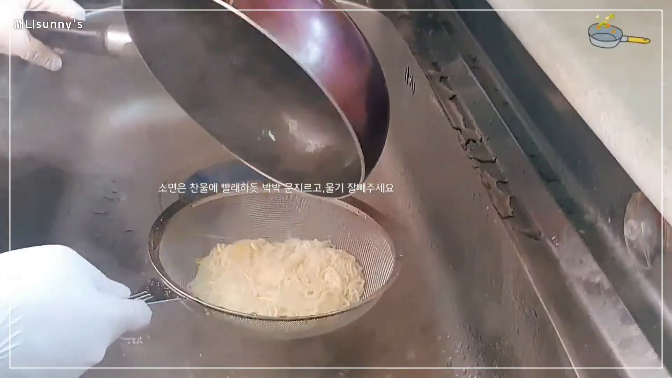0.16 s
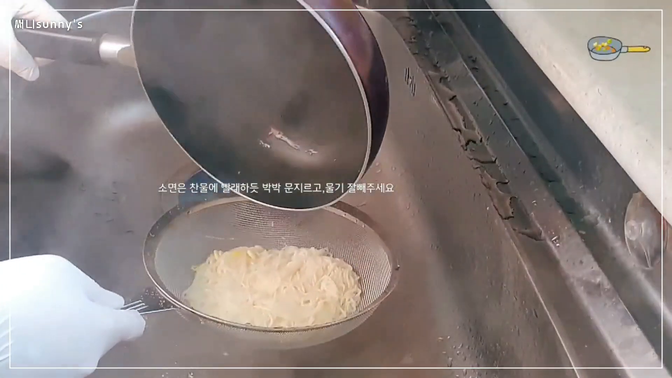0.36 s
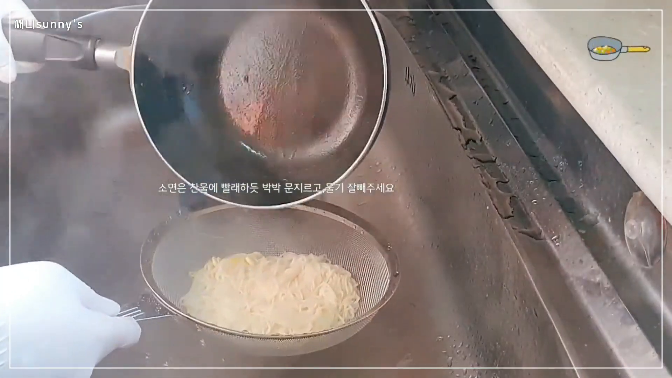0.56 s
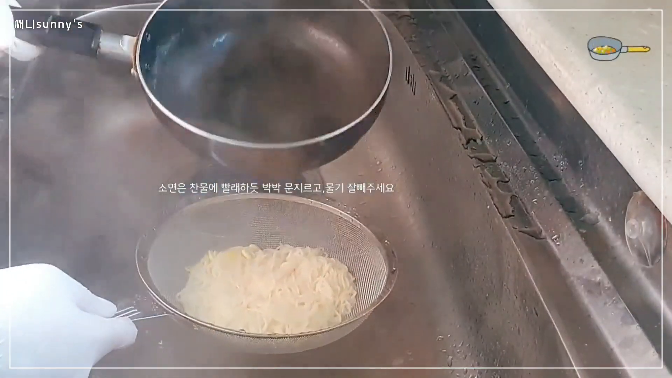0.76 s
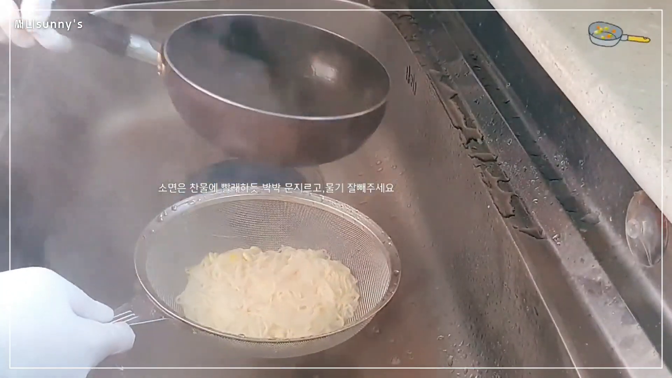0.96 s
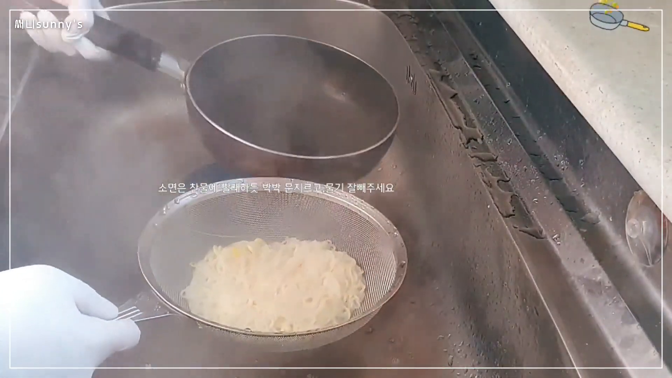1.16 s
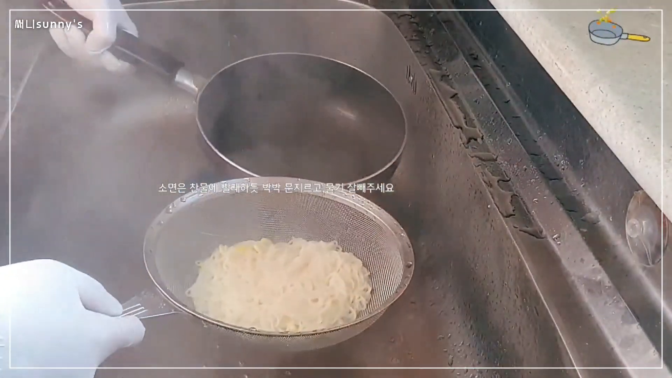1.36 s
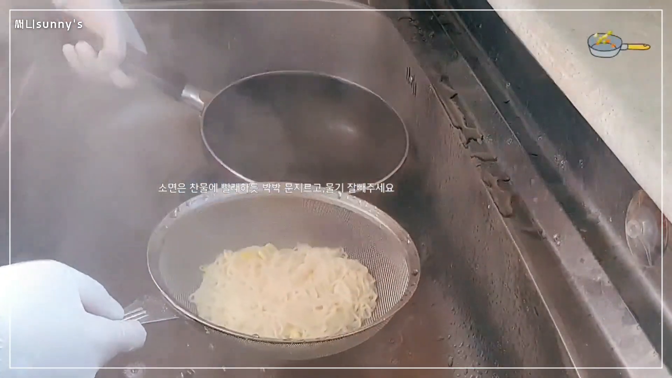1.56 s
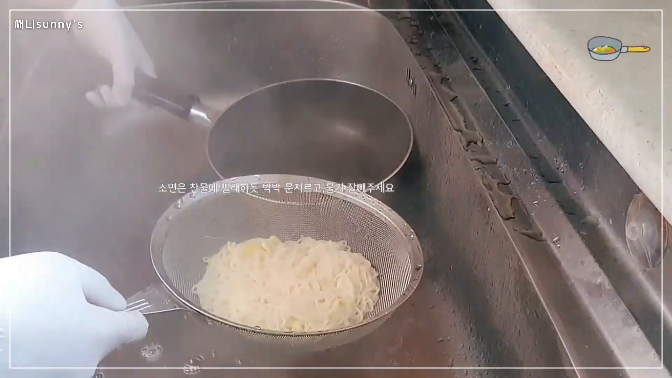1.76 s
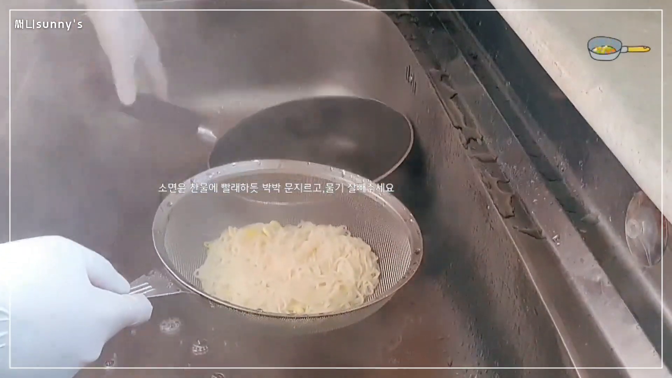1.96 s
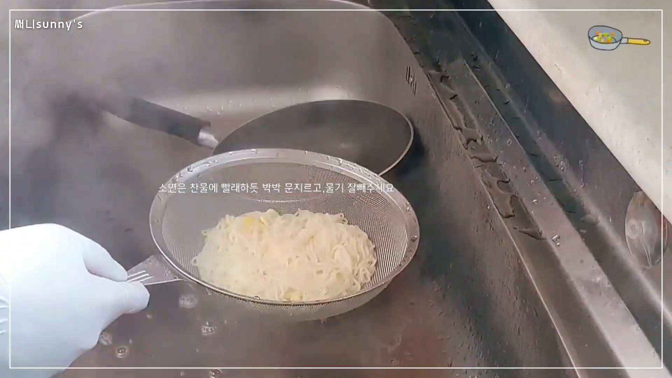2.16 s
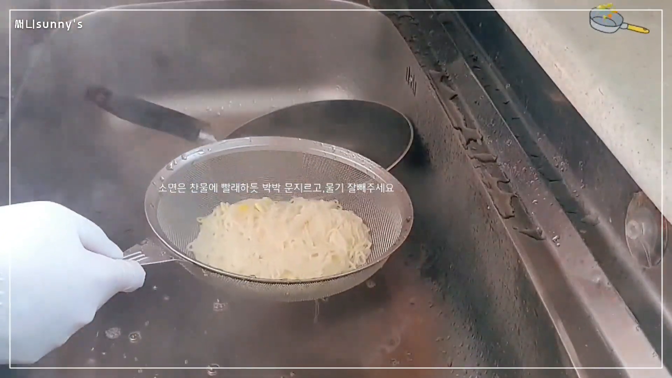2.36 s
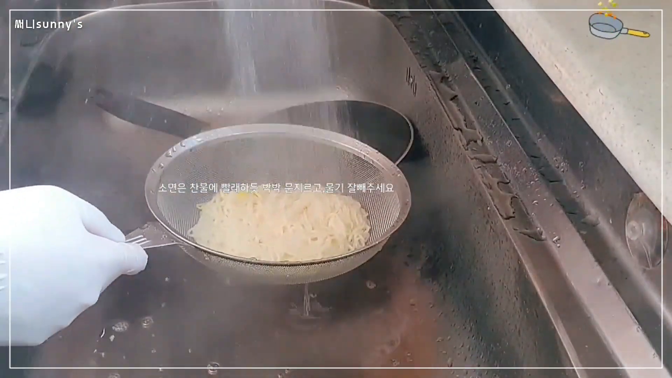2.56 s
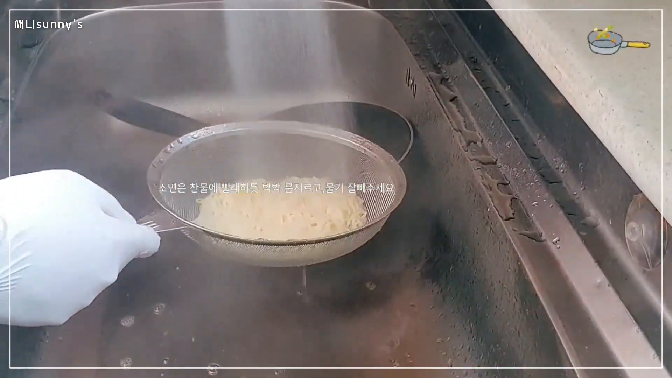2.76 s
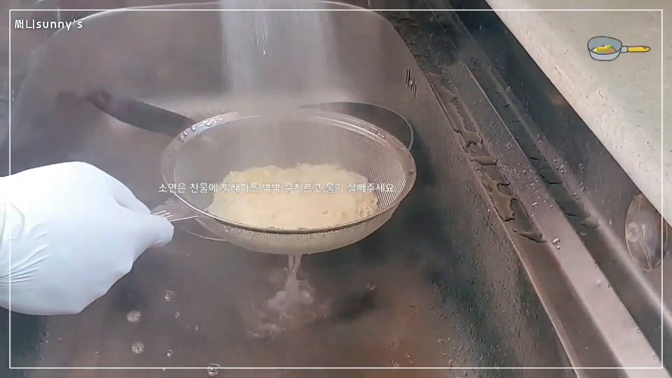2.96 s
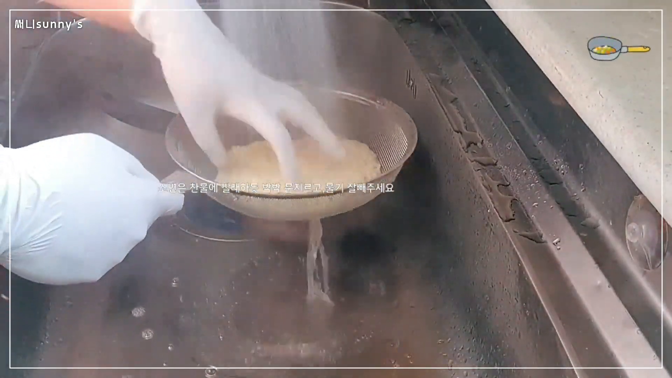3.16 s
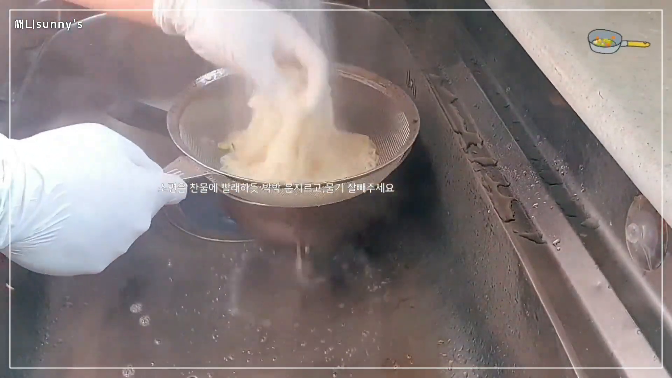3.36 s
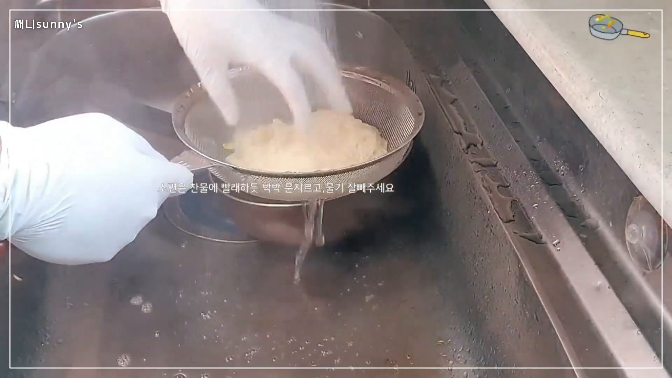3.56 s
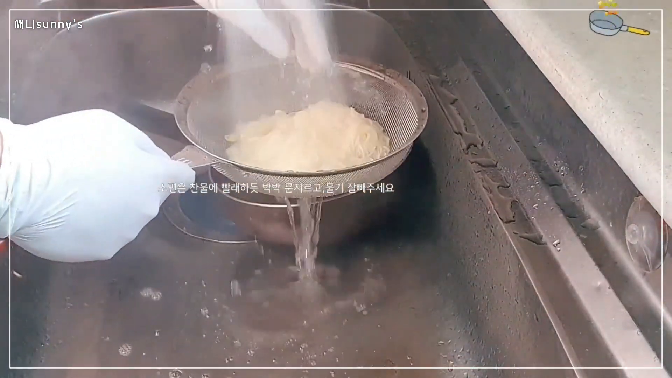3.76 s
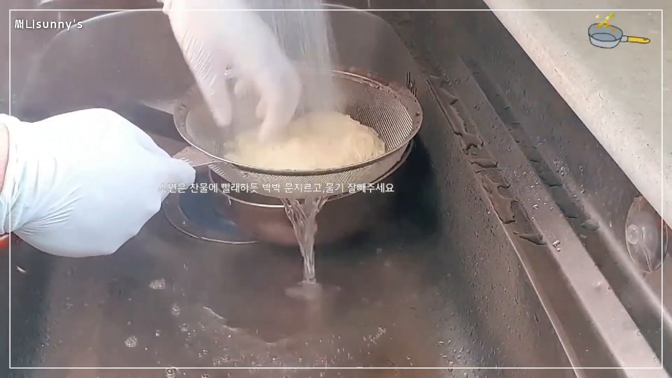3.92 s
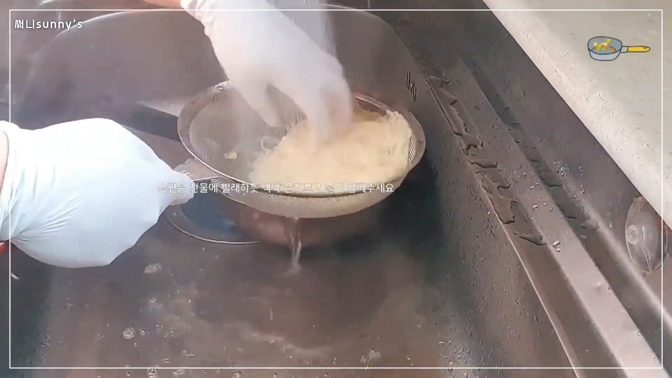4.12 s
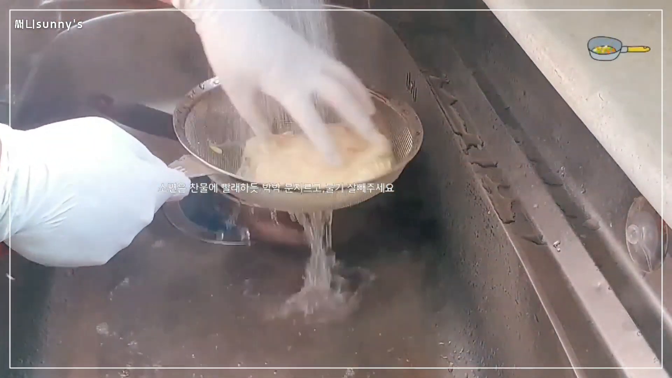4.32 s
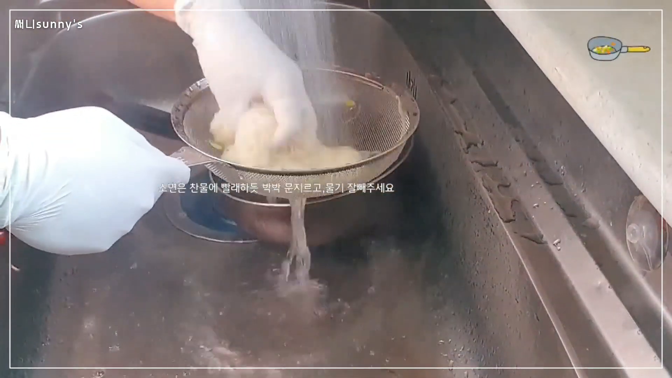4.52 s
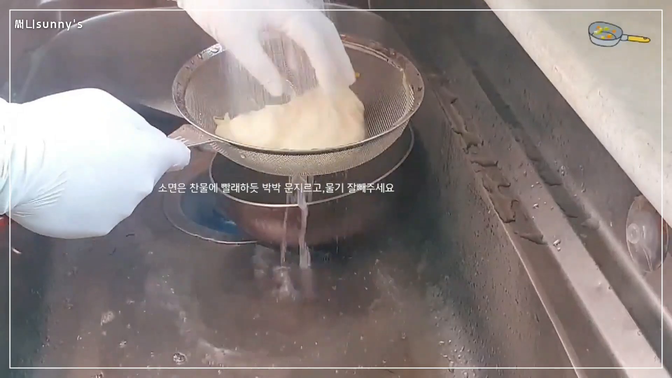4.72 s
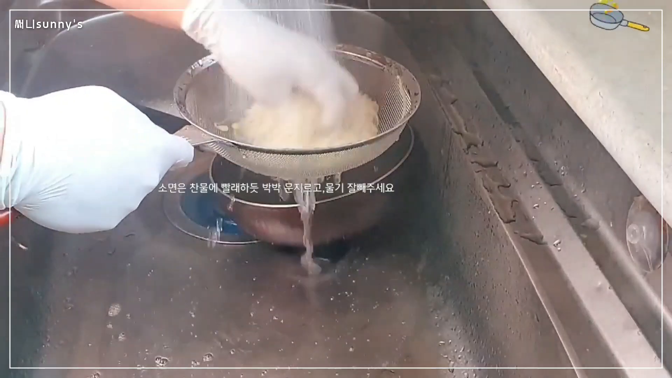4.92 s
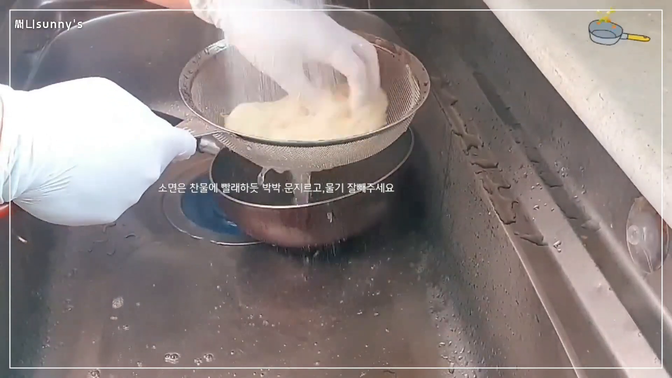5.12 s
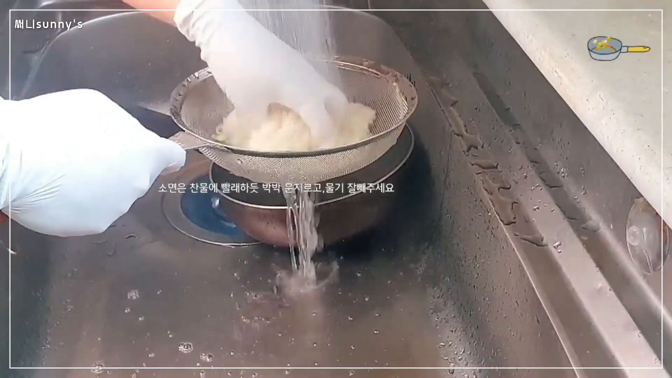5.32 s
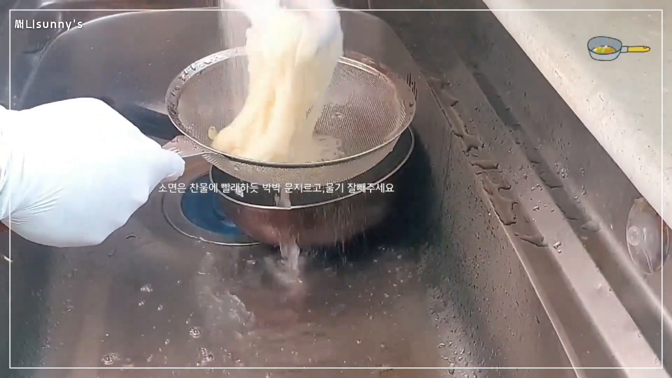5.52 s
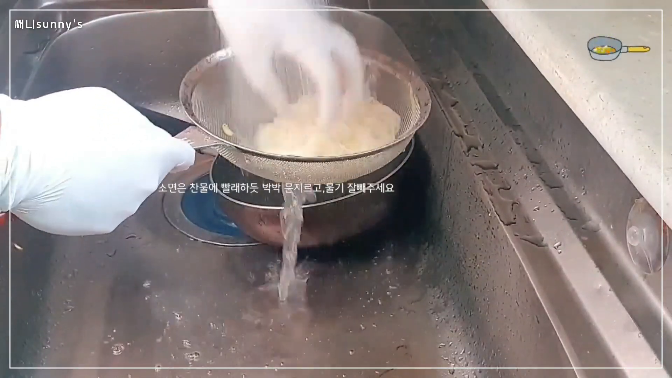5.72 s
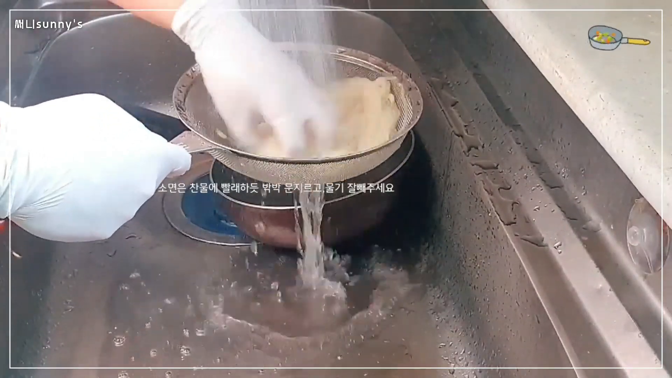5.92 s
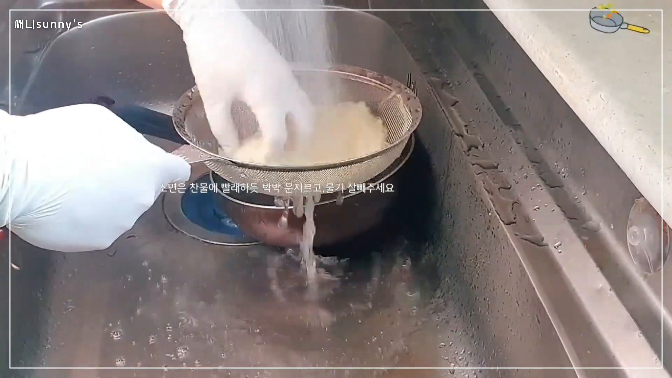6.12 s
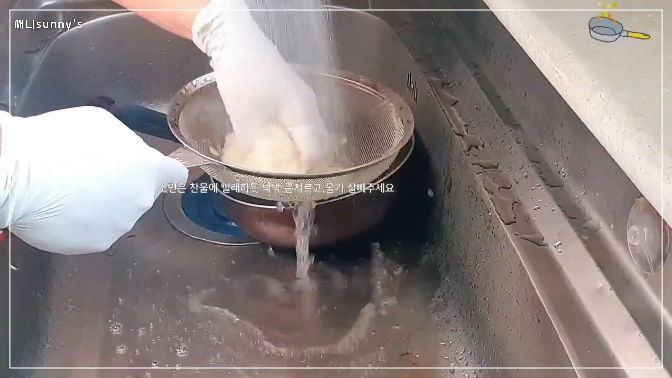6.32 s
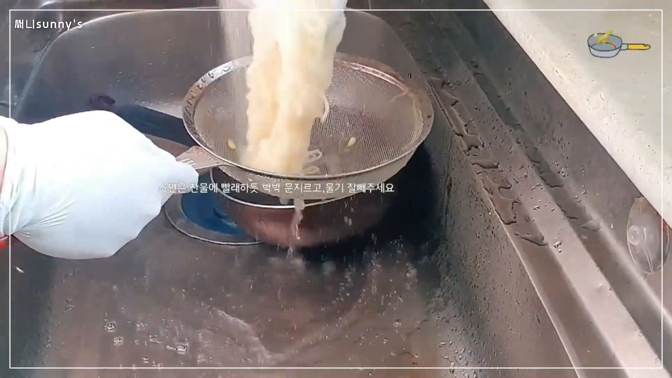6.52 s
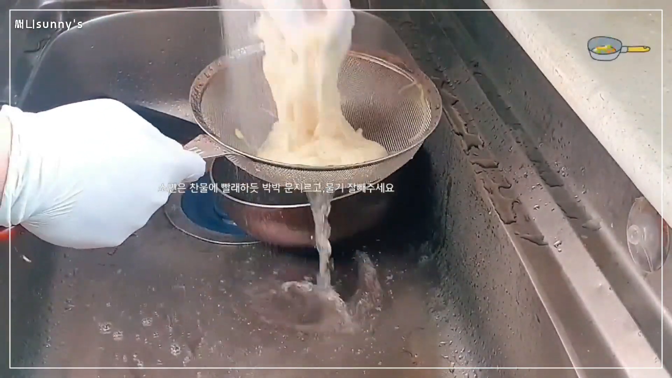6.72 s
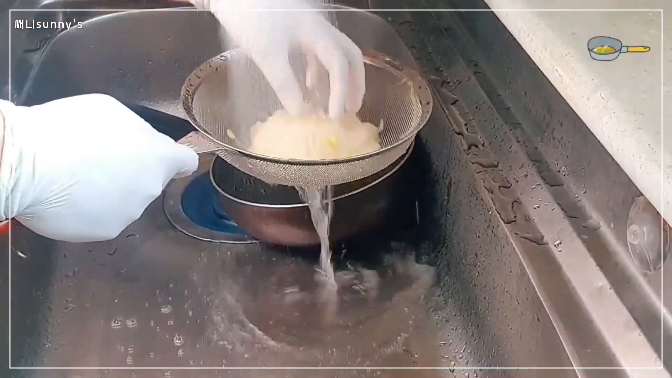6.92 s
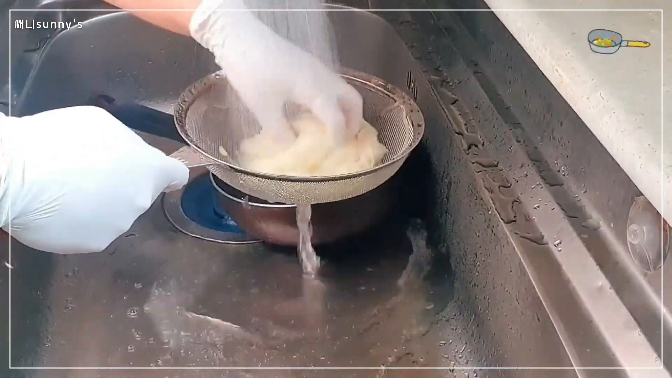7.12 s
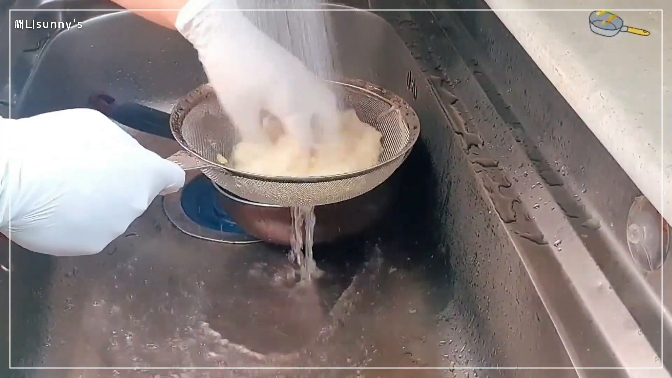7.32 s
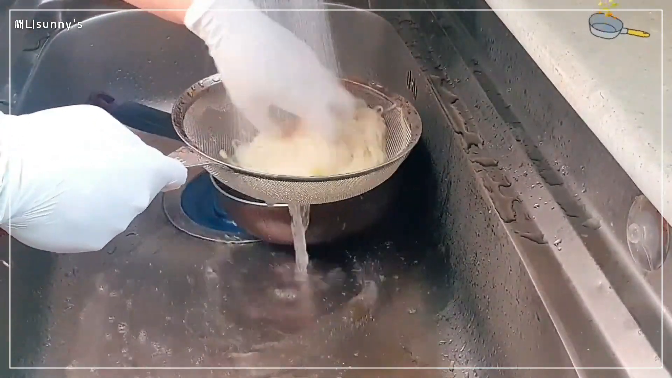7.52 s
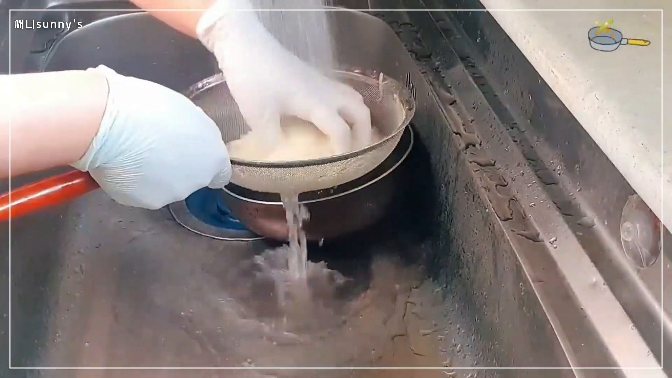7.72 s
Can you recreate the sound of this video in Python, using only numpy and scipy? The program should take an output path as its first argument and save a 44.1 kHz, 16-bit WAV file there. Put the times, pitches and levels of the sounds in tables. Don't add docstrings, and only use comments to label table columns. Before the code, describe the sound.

In a small kitchen with a low room hum and faint fan whine, a pan bumps a thin steel sink with soft hollow booms while drops tick and plop. It is set down with harder clanks and a short scrape. A tap sputters open, and steady spray hisses through a mesh strainer, gurgling and drumming on the basin. Irregular splashes follow, with one loud booming knock midway. Close stereo microphone.

```python
import sys
import numpy as np
from scipy import signal
from scipy.fft import rfft, irfft, next_fast_len
from scipy.io import wavfile
from scipy.ndimage import uniform_filter1d, map_coordinates

SR = 44100
rng = np.random.default_rng(int(sys.argv[2]) if len(sys.argv) > 2 else 0)


def materialize(psi):
    bounded = np.clip(np.atleast_2d(psi).T, -1, 1)
    quanta = np.round(bounded * 32767).astype(np.int16)
    wavfile.write(sys.argv[1], SR, quanta)


def voltage_ratio(level):
    return 10 ** (np.asarray(level, float) / 20)


N = 343098

# [start_s, level_db]
TAP_OPENING = [(2.3, -69), (2.64, -68), (2.7, -54), (2.725, -46.5), (2.765, -51.5), (2.79, -43), (2.9, -41),
               (3.06, -42.5), (3.59, -44.5), (3.99, -41), (4.36, -41.5), (4.52, -44.5), (5.0, -45),
               (5.2, -42.5), (5.45, -45.5), (6.02, -41), (6.58, -44.5), (7.6, -42)]
# [frequency_hz, density_db per Hz]
SPRAY_TONE = [(590, -8.5), (1000, -5.5), (1160, -1.5), (1420, -9.5), (1550, -3), (1960, -8), (3010, 0.5),
              (4520, -4.5), (7620, -3), (9380, -15), (12500, -8.5), (15100, -10.5), (16000, -4.5)]
# [pitch_hz, width_hz, level_db]
MESH_MODES = [(3270, 96, -25), (5450, 430, 19), (6920, 23, -36.5), (7720, 81, 24.5)]
# [frequency_hz, density_db per Hz]
GURGLE_TONE = [(210, -48), (350, 5.5), (426, -5), (515, 0.5), (810, 3.5), (1050, 0.5), (1160, 5.5),
               (1410, 0), (1900, -6.5), (2700, -2.5), (3250, -47), (5500, -120)]
# [frequency_hz, density_db per Hz]
DRUM_TONE = [(65, -22), (110, -6.5), (205, 7), (275, -8.5), (350, 4), (428, -16.5), (520, -5.5), (680, -37),
             (1140, -120)]
# [frequency_hz, density_db per Hz]
RUMBLE_TONE = [(12, -36), (20, 1), (49, 2.5), (125, 10.5), (160, -39), (280, -120)]
# [pitch_hz, width_hz, level_db]
WET_MODES = [(218, 34, -22), (488, 71, -15.5), (772, 120, -4.5), (1140, 13, -4.5), (1760, 12, 7.5),
             (3050, 530, 3.5)]
# [start_s, length_s, level_db, on bare steel over puddle steel_db]
GUSHES = [(2.494, 0.075, -61.5, 8), (2.74, 0.34, -51, -8.5), (3.088, 0.24, -54, -15),
          (3.533, 0.05, -54.5, -0.5), (3.81, 0.3, -59.5, 8), (4.247, 0.28, -50, -12),
          (4.72, 0.14, -50.5, 4), (4.984, 0.035, -50.5, 0), (5.106, 0.046, -48, -10),
          (5.25, 0.16, -59, -0.5), (5.468, 0.29, -53, -5), (5.818, 0.027, -44.5, -37),
          (5.87, 0.42, -52.5, 2.5), (6.407, 0.34, -50, -9.5), (6.778, 0.22, -53, 3),
          (7.097, 0.077, -57.5, 9.5), (7.514, 0.049, -61, 10), (7.722, .1, -57, -7)]
# (gurgle_db, drumming_db, rumble_db)
THIN_STREAM_DB = (-64, -65, -64)
# [frequency_hz, left minus right difference_db]
TAP_BALANCE = [(60, 1.5), (240, 0), (950, 0.5), (3770, -1.0), (15000, -1)]
# [start_s, peak_db, colour_hz, t60_s]
SPLASHES = [(2.354, -52, 2100, .087), (2.456, -49.5, 6800, 0.16), (2.5425, -40.5, 2170, 0.078),
            (2.6, -33, 3600, 0.15), (2.719, -29.5, 2400, 0.18), (3.0917, -30, 5450, 0.21),
            (3.671, -34, 7400, 0.14), (3.8751, -29.5, 5460, 0.2), (4.689, -31.5, 5270, 0.15),
            (4.989, -33, 2650, 0.14), (5.0995, -30.5, 2880, 0.28), (5.4985, -21, 8400, 0.11),
            (5.6707, -30, 4180, 0.14), (5.816, -36, 6500, 0.09), (5.831, -16.5, 3030, 0.098),
            (5.834, -24.5, 1610, 0.11), (6.391, -32, 7900, 0.057), (6.7885, -28, 2470, 0.12),
            (6.835, -27, 7800, .069), (6.8867, -32, 5890, 0.11), (7.046, -24, 8200, 0.03),
            (7.062, -24, 3300, 0.12), (7.1, -25, 4640, 0.15), (7.1124, -26, 4200, .12),
            (7.365, -33, 2850, 0.11), (7.4623, -32, 2850, 0.19), (7.505, -32, 3050, 0.12),
            (3.585, -32, 5740, .1), (4.375, -28.5, 4090, 0.05), (4.484, -22.5, 4100, 0.13),
            (4.522, -29, 7800, .1), (5.37, -32.5, 2880, .1), (6.061, -30, 7930, .1),
            (6.365, -36, 5000, 0.087), (6.443, -33, 7360, 0.19), (6.553, -32, 2800, .3),
            (6.635, -36, 2800, 0.21), (6.975, -31.5, 6500, .08), (7.525, -31.5, 4800, .1)]
# [start_s, peak_db, colour_hz, t60_s]
SLAPS = [(7.057, -18, 2600, .07), (7.058, -17, 6700, .07), (7.059, -24, 4700, .07), (7.0985, -21, 5400, .1),
         (7.105, -23, 4600, .1), (7.112, -22, 4100, .12), (7.463, -32, 1750, .1), (7.479, -29, 3000, .12),
         (7.488, -28, 3150, .1), (7.345, -32, 7500, .15), (7.3, -34, 7400, .2), (7.075, -30, 7800, .08),
         (0.205, -52, 4900, .08), (0.275, -52, 4900, .08), (0.416, -51, 4900, .06), (0.473, -57, 3500, .05),
         (0.218, -56, 3500, .08), (0.75, -54, 12500, .2), (1.02, -58, 12500, .5), (3.095, -27, 13000, .12),
         (7.05, -22, 11500, .1), (7.1, -25, 12000, .12), (6.8, -31, 12000, .2)]
# [start_s, peak_db, pitch_hz, t60_s]
DROPS = [(0.0394, -70, 2700, .1), (0.1558, -48.5, 6130, 0.14), (0.158, -51, 5700, 0.14),
         (0.157, -55, 2500, .1), (0.205, -50, 4730, 0.12), (0.275, -53, 3300, 0.23),
         (0.278, -51, 5000, 0.09), (0.298, -59, 3290, .1), (0.3576, -58, 3380, 0.23),
         (0.416, -49, 4840, .088), (0.434, -56, 3400, .07), (0.474, -54, 2550, .07),
         (0.295, -60, 1900, .12), (0.523, -50, 5100, 0.1), (0.604, -58, 8100, 0.16),
         (0.686, -56, 2730, .097), (0.7365, -57.5, 6950, 0.39), (0.748, -50, 2830, 0.13),
         (0.765, -54, 3700, 0.11), (0.84, -54, 5600, .06), (0.896, -56.5, 6200, 0.14),
         (0.921, -60, 3200, 0.14), (1.012, -53.5, 5670, 0.37), (1.09, -60.5, 5450, .35),
         (.93, -60, 3200, .3), (.5, -58, 3450, 0.28), (1.2276, -53, 7560, 0.058), (1.401, -57, 7100, 0.14),
         (1.492, -59, 4460, 0.13), (1.566, -55.5, 2000, 0.23), (1.58, -60, 6700, 0.2),
         (1.6442, -46, 4900, 0.15), (2.489, -37.5, 4090, 0.086), (2.515, -51, 5500, 0.071),
         (2.66, -54, 3000, .2), (2.27, -61, 3500, 0.26)]
# [start_s, peak_db, pitch_hz, t60_s]
PLOPS = [(0.206, -38, 1050, 0.045), (0.208, -49, 1250, .04), (2.93, -47, 1140, .12),
         (3.22, -47, 1140, 0.11), (3.52, -46, 1140, .1), (3.68, -51, 1140, .1), (3.88, -48, 800, 0.16),
         (6.47, -46, 950, 0.17), (0.274, -38.5, 1010, 0.051), (0.303, -47, 1087, 0.072),
         (0.463, -53.5, 1314, 0.13), (0.806, -48, 1055, 0.073), (1.563, -44, 1050, 0.08),
         (1.59, -41.5, 1030, 0.1), (2.549, -28.5, 653, 0.033), (2.6, -38.5, 1145, 0.064),
         (2.779, -45, 1135, 0.11), (3.099, -44.5, 822, 0.21), (3.159, -40, 830, 0.076),
         (3.281, -44, 1140, 0.17), (3.357, -43.5, 1142, 0.11), (3.478, -48, 1140, 0.3),
         (3.801, -46, 1130, 0.15), (4.148, -42, 1120, 0.099), (4.989, -32.5, 980, 0.082),
         (3.655, -44, 338, 0.17)]
# [pitch_hz, level_db, t60_s]
PAN_MODES = [(1000, -5.0, .2), (1294, -13, 0.22), (1540, -33, 0.32), (1677, -15, 0.4), (1880, -21, 0.22),
             (1890, -14, 0.22), (2100, -27.0, 0.83), (2300, -21, 0.37), (2770, -8.5, 0.28),
             (3234, -8.5, 0.22), (3980, -6.5, 0.25)]
# [pitch_hz, level_db, t60_s]
SINK_MODES = [(48.8, 2, 0.23), (69.53, -2.5, 1.36), (110, 5, 0.33), (141.7, 4.5, 0.37),
              (166.1, 3.5, 0.55), (84.1, -4.5, .4),
              (215.0, 8, 0.29), (242, -3.5, 0.51), (328.8, 8, 0.22), (363.2, 4.5, 0.23), (526, 0, 0.37),
               (571, -24, 0.25), (610.5, -5.0, 0.32), (658, -7.5, 0.56), (689, -4.5, 0.21), (772, -8, .5),
               (830, -14.0, 0.22), (920, -11, 0.53), (1120, -11.5, 0.24), (1300, -9, 0.14),
               (480, -4.5, 0.24), (870, -15, .3), (970, -11, 0.27), (1170, -12, 0.28)]
# [frequency_hz, t60_s]
SHUDDER_DECAY = [(40, 0.56), (150, 0.72), (600, 0.48), (1500, 0.35), (4000, 0.22), (10000, 0.052)]
BLOW_HZ = [60, 145, 400, 1000, 1800]
# [start_s, boom peak_db, hardness 0-1, nearness to the wall: extra body_db]
BUMPS = [
    (0.19, -19.5, 0.06, 0),
    (0.206, -12.5, 0.13, 1),
    (0.237, -18.5, 0.68, 5),
    (0.285, -18.5, 0.65, -8),
    (0.35, -25.5, 0.33, -6),
    (0.408, -25, 0.46, -3),
]
# [start_s, boom peak_db, hardness 0-1, nearness to the wall: extra body_db]
SET_DOWN = [(1.67, -20.5, 0.94, -12), (1.686, -26.5, 0.94, -3.5), (1.709, -15.5, 0.075, -0.5),
            (1.749, -25, 0.38, -1), (1.911, -23, 0.82, 5), (1.949, -18, 0.2, -1), (2.045, -26, 0.66, -2),
            (2.083, -24, 0.9, -5), (2.105, -19, 0.64, 0), (2.158, -23, 0.4, -1), (2.19, -26, 0.31, -3)]
# [start_s, boom peak_db, hardness 0-1, nearness to the wall: extra body_db]
KNOCKS = [
    (4.456, -30, 0.2, 0),
    (4.4775, -11, 0.5, -3),
    (4.484, -14.5, 0.69, -6),
    (4.497, -20, 0.94, -2),
    (4.535, -27, 0.55, 3),
    (4.599, -20, 0.51, 0.5),
]
# [thud_db, body_db, ring_db, clank_db]
BUMP_FEEL = [(-16.5, -43.5, -34, -38.5), (-7, -26, -59, -32)]
# [thud_db, body_db, ring_db, clank_db]
SET_DOWN_FEEL = [(-16.5, -13.5, -35.5, -44), (5, -0.5, 0.5, 5.5)]
# [thud_db, body_db, ring_db, clank_db]
KNOCK_FEEL = [(2, -25, -27, -46), (-7.5, 13, 5.5, -6)]
# [start_s, peak_db, pitch_hz, t60_s]
THUMPS = [(.24, -19, 143, 0.11), (1.676, -17, 151, 0.36), (0.18, -41, 322, 0.14), (.245, -38, 362, 0.21),
          (.23, -33.5, 222, 0.15), (.265, -46, 505, 0.11), (.3, -43.5, 370, 0.13),
          (1.672, -27.5, 780, 0.18), (1.672, -30, 915, 0.18), (1.69, -25, 340, 0.22),
          (1.93, -32, 522, 0.28), (2.09, -29, 522, 0.3), (2.17, -22.5, 330, 0.14), (4.49, -18, 690, 0.12),
          (4.525, -20, 530, 0.27), (4.58, -23, 240, 0.28), (4.62, -26, 372, 0.28), (4.55, -26.5, 926, .3),
          (4.62, -32, 522, 0.64), (4.7, -41, 790, 0.5), (4.62, -26, 112, 0.4), (4.66, -31, 215, 0.3),
          (4.478, -17, 215, .12), (4.498, -23, 985, 0.11), (2.15, -34, 665, 0.2), (2.18, -26.5, 215, 0.23),
          (.3, -27.5, 110, .4), (1.672, -27, 1400, 0.14), (1.674, -29, 1230, 0.18), (1.699, -17, 49, 0.22),
          (1.913, -17, 368, .12), (2.0857, -5, 190, 0.12), (2.082, -29, 1030, .1), (2.082, -29, 1250, .1),
          (2.09, -35, 1680, .22), (2.092, -38, 2300, .15), (2.14, -30, 522, .3), (1.675, -31, 2020, .14),
          (1.672, -30, 1800, .15), (1.915, -35, 1250, .15), (4.5, -32, 1150, .2), (4.52, -27, 830, .2),
          (4.5, -26, 470, .2), (4.53, -37, 1300, .2), (4.54, -30, 610, .2), (4.4762, -3, 146, 0.11),
          (4.4842, -11, 322, 0.2), (4.478, -12, 90, .25)]
# [frequency_hz, density_db per Hz]
TRICKLE_TONE = [(880, -37), (1500, -2.5), (2320, 2.5), (2940, 1.5), (3280, 0), (3380, 1.5), (6240, -1.5),
                (8160, -5), (9100, -14), (16000, -15.5)]
# [start_s, length_s, rasp_db, rumble_db]
DRAGS = [
    (0.0, 0.048, -69, -74),
    (1.72, 0.17, -62, -56),
    (1.918, 0.21, -51.5, -31.5),
    (2.472, 0.12, -65, -53),
]
# [frequency_hz, density_db per Hz]
HUM_TONE = [(13, -41), (22, -24), (54, -0.5), (114, -16), (150, -5), (272, -16), (513, -18.5), (858, -23),
            (1110, -20.5), (1380, -26), (2500, -34), (3250, -58), (5500, -120)]
# (pitch_hz, width_hz, level_db)
FAN_WHINE = (1142, 13, -73)
# [frequency_hz, level_db]
TREBLE_SHADING = [(7600, -1), (8600, -10.5), (9600, -16), (12000, -12.5), (16000, -15)]
# [frequency_hz, likeness 0-1]
LIKENESS = [(60, 0.97), (250, 0.95), (600, 0.76), (1200, 0.21), (2400, 0.098), (4500, 0.1), (9000, 0.092)]

GUSH_RISE_S, GUSH_FALL_S = 0.045, 0.042
DRAG_RISE_S, DRAG_FALL_S = 0.036, 0.032
CABINET_DB = -7
SPRAY_PATCH_DB, GURGLE_PATCH_DB, SURGE_DB = 3.4, 4.2, 0.6
DROP_HISS, DROP_SMEAR_HZ = 1.1, 190
TRICKLE_DB, SPATTER_DB, HUM_DB = -70, -58.5, -49.5
BAND_WIDTH, BAND_FLOOR_DB, EVEN_DB, EVEN_HZ = 0.045, -11, -5, 1300
WANDER_RAD, WANDER_HZ, WANDER_DB = 1.1, 30, 4
LAG_S = 4 / SR
CEILING, TOP_HZ = 0.93, 15760


def tap():
    spray_db = np.interp(np.arange(N) / SR, *np.transpose(TAP_OPENING))
    s, length, gush_db, steel_db = np.transpose(GUSHES)
    gush = swells(s, length, GUSH_RISE_S, GUSH_FALL_S)
    pool, steel = gush(gush_db), gush(gush_db + steel_db)
    thin_gurgle, thin_drum, thin_rumble = voltage_ratio(np.array(THIN_STREAM_DB))
    opened = np.clip((np.arange(N) / SR - TAP_OPENING[0][0]) / 0.12, 0, 1)

    def rings(hz, body):
        return 1 + 5.9 * sum(voltage_ratio(db) * np.abs(peak(hz, c, w)) for c, w, db in body)

    spray = rush(lambda hz: voltage_ratio(along(SPRAY_TONE, hz)) * rings(hz, MESH_MODES) ** 0.24,
                 patchy_db=SPRAY_PATCH_DB, grain_db=1.0)
    spray = spray + voltage_ratio(-13.0) * bubbles(count=6000, centre_hz=4256, octaves=0.55, cycles=40, spread_db=-6.0)
    gurgle = rush(lambda hz: voltage_ratio(along(GURGLE_TONE, hz)) * rings(hz, WET_MODES),
                  patchy_db=GURGLE_PATCH_DB, grain_db=-0.1)
    drum = rush(lambda hz: voltage_ratio(along(DRUM_TONE, hz)) * rings(hz, WET_MODES), patchy_db=2.5, grain_db=-2.5)
    rumble = unit(filtered(rng.standard_normal(N), lambda hz: voltage_ratio(along(RUMBLE_TONE, hz))))

    surge_db = SURGE_DB * (wobble(26) + wobble(35))
    water = voltage_ratio(spray_db + 2.0 + surge_db) * spray
    water = water + (thin_gurgle + pool) * voltage_ratio(-0.5 + 1.5 * wobble(25)) * gurgle
    water = water + (thin_drum + steel) * voltage_ratio(1.5 * wobble(18)) * drum
    water = water + (thin_rumble + voltage_ratio(CABINET_DB) * steel) * voltage_ratio(3 * wobble(10)) * rumble
    return filtered(opened * water, lambda hz: voltage_ratio(along(TAP_BALANCE, hz) / 2 * np.array([[1], [-1]])))


def splashes(rows, rise_s, broad, width):
    out, t = np.zeros((2, N)), np.arange(SR // 4) / SR
    crest_s = 3 * rise_s
    for s, db, colour_hz, t60 in rows:
        shape = np.where(t < crest_s, 0.83 * np.exp(t / rise_s - 3), voltage_ratio(-60 * (t - crest_s) / t60))
        grain_db = 0.51 * np.repeat(rng.standard_normal(len(t) // 25), 25)
        grains = rng.standard_normal((2, len(t))) * voltage_ratio(grain_db)

        def tone(hz):
            colour = broad + np.abs(peak(hz, colour_hz, width * colour_hz)) ** 2
            return colour * voltage_ratio(along(TREBLE_SHADING, hz)) * hz ** 3 / (hz ** 3 + 1400 ** 3)

        add(out, s + 0.001022 - crest_s, voltage_ratio(db - 7.5) * unit(stereo(grains, tone)) * shape)
    return out


def drops():
    out, t = np.zeros((2, N)), np.arange(SR // 4) / SR
    for s, db, pitch_hz, t60 in DROPS:
        def tone(hz):
            colour = np.abs(peak(hz, pitch_hz, DROP_SMEAR_HZ)) ** 2 + 0.088 * DROP_HISS
            return colour * voltage_ratio(1.66 * along(TREBLE_SHADING, hz)) / (1 + (1800 / (hz + 1)) ** 4)

        shape = (1 - np.exp(-t / 0.0004)) * voltage_ratio(-60 * t / t60)
        add(out, s, voltage_ratio(db - 3.0) * unit(stereo(rng.standard_normal((2, len(t))), tone)) * shape)
    for s, db, pitch_hz, t60 in PLOPS:
        shape = (1 - np.exp(-t / 0.003)) ** 2 * voltage_ratio(-60 * t / t60)
        add(out, s - 0.003, voltage_ratio(db + 1.2) * shape * np.sin(2 * np.pi * pitch_hz * t * (1 + 0.12 * t)))
    return out


def basin():
    out, t = np.zeros((2, N)), np.arange(5 * SR // 8) / SR
    clear = SINK_MODES + [(f, db - 3.0, t60) for f, db, t60 in PAN_MODES]
    mode_hz, level_db, t60 = np.transpose(clear)[..., None]
    mode_t60 = np.minimum(t60, 20 / np.sqrt(mode_hz))
    fading = voltage_ratio(level_db - 14.5 + 1.68 * np.log2(mode_hz / 200) - 60 * t / mode_t60)
    partner = 0.5 * np.sin(2 * np.pi * mode_hz * rng.normal(1, 0.011, mode_hz.shape) * t)
    modes = fading * (np.sin(2 * np.pi * mode_hz * t) + partner)

    grid_hz = np.geomspace(20, 6000, num=900)
    near_modes = np.abs(peak(grid_hz, mode_hz, BAND_WIDTH * mode_hz)) ** 2
    crowd = voltage_ratio(BAND_FLOOR_DB) + (voltage_ratio(0.5 * level_db) * near_modes).sum(axis=0)
    crowd = np.where(grid_hz < EVEN_HZ, crowd, voltage_ratio(EVEN_DB))

    def dense_tone(hz):
        return voltage_ratio(along(TREBLE_SHADING, hz)) * np.interp(hz, grid_hz, crowd) * np.sqrt(SR / 2 / (hz + 30))

    onset = (1 - np.exp(-t / 0.00058)) * (1 - t / t[-1])
    for s, db, *above_db in contacts():
        colour = [(10, -62), (24, -8.0)] + list(zip(BLOW_HZ, [0, *above_db])) + [(16000, above_db[-1] + 5.0)]
        hz, when, z = signal.stft(rng.standard_normal((2, len(t) + 512)), SR, nperseg=1024)
        fade = voltage_ratio(-60 * when / along(SHUDDER_DECAY, hz)[:, None])
        dense = stereo(signal.istft(z * fade, SR, nperseg=1024)[1][:, :len(t)], dense_tone)
        ring = voltage_ratio(rng.normal(0, 3.5, len(modes))) @ modes
        blow = (ring + voltage_ratio(-4.2) * dense) * onset
        add(out, s, voltage_ratio(db) * causal(blow, lambda f: voltage_ratio(along(colour, f))))
    return out


def contacts():
    for rows, (soft, hard) in (BUMPS, BUMP_FEEL), (SET_DOWN, SET_DOWN_FEEL), (KNOCKS, KNOCK_FEEL):
        for s, db, hardness, wall_db in rows:
            thud, body, ring, clank = np.add(soft, hardness * np.subtract(hard, soft))
            yield s, db, thud, body + wall_db, ring, clank


def thumps():
    out, t = np.zeros((2, N)), np.arange(SR // 2) / SR
    for s, db, pitch_hz, t60 in THUMPS:
        knots = rng.standard_normal((2, WANDER_HZ))
        drift, swell = [map_coordinates(row, [t * WANDER_HZ]) * np.clip(t / 0.05, 0, 1) for row in knots]
        level = voltage_ratio(db + WANDER_DB * swell - 60 * t / t60) * (1 - np.exp(-t / 0.0025))
        add(out, s, level * np.sin(2 * np.pi * pitch_hz * t + WANDER_RAD * drift))
    return out


def kitchen():
    s, length, rasp_db, rumble_db = np.transpose(DRAGS)
    drag = swells(s, length, DRAG_RISE_S, DRAG_FALL_S)
    running = swells([TAP_OPENING[3][0]], [N / SR], rise_s=0.13, fall_s=1)
    trickle = rush(lambda hz: voltage_ratio(along(TRICKLE_TONE, hz)), patchy_db=4.0, grain_db=-2.0)
    trickle = trickle + voltage_ratio(-3.5) * bubbles(count=2000, centre_hz=4234, octaves=0.62, cycles=39, spread_db=0.5)
    hum = rush(lambda hz: voltage_ratio(along(HUM_TONE, hz)), patchy_db=2.5, grain_db=0.5)
    whine_hz, width_hz, whine_db = FAN_WHINE
    whine = unit(filtered(rng.standard_normal(N), lambda hz: peak(hz, whine_hz, width_hz) ** 2))
    patter = (voltage_ratio(TRICKLE_DB) + running([SPATTER_DB]) + drag(rasp_db)) * voltage_ratio(1.0 + 2 * wobble(14))
    room = (voltage_ratio(HUM_DB) + drag(rumble_db)) * voltage_ratio(-7.0)
    return patter * trickle + room * hum + voltage_ratio(whine_db) * whine


def bubbles(count, centre_hz, octaves, cycles, spread_db):
    when_where = rng.random((count, 2))
    hz = np.clip(centre_hz * 2 ** (octaves * rng.standard_normal((count, 1))), 500, 8000)
    level = voltage_ratio(spread_db * np.minimum(rng.exponential(size=(count, 1)), 3))
    t = np.arange(500) / SR
    turns = hz * t
    envelope = level * turns * np.exp(-3 * turns / cycles)
    grain = envelope * np.sin(2 * np.pi * turns * (1 + 0.0097 * turns / cycles))
    at = (when_where[:, :1] * N).astype(int) + np.arange(len(t))
    angle = when_where[:, 1:] * np.pi / 2
    sides = np.cos(angle), np.sin(angle)
    return unit(np.array([np.bincount(at.ravel(), (grain * side).ravel(), N)[:N] for side in sides]))


def rush(gain, patchy_db, grain_db):
    z = signal.stft(rng.standard_normal((2, N)), nperseg=1024)[2]
    field = uniform_filter1d(rng.standard_normal(z.shape[1:]), size=2, axis=0)
    field = uniform_filter1d(field, size=6, axis=1)
    pair = signal.istft(z * voltage_ratio(patchy_db * unit(field)), nperseg=1024)[1][:, :N]
    return unit(stereo(pair * voltage_ratio(grain_db * wobble(400)), gain))


def swells(starts, lengths, rise_s, fall_s):
    at = np.arange(0, N, 64)
    t = at / SR - np.c_[starts]
    rows = np.clip(t / rise_s + 1, 0, 1) ** 2 * np.exp(-np.maximum(t - np.c_[lengths], 0) / fall_s)
    return lambda db: np.interp(np.arange(N), at, voltage_ratio(db) @ rows)


def wobble(rate):
    at = np.arange(0, N + 16, 16)
    knots = rng.standard_normal(int(N * rate / SR) + 4)
    return np.interp(np.arange(N), at, map_coordinates(knots, [at * rate / SR]))


def stereo(pair, gain):
    def spread(hz):
        turn = np.arccos(np.clip(along(LIKENESS, hz), -1, 1)) / 2
        return gain(hz) * np.array([np.cos(turn), np.sin(turn)])

    mid, side = filtered(pair, spread)
    return np.array([mid + side, mid - side])


def from_side(x, side):
    ports = np.array([[1], [-1]])
    return filtered(x, lambda hz: np.exp(-1j * np.pi * hz * LAG_S * side * ports))


def peak(hz, centre_hz, width_hz):
    return 1j * hz * width_hz / (centre_hz ** 2 - hz ** 2 + 1j * hz * width_hz)


def causal(x, gain):
    m = 8192
    cepstrum = irfft(np.log(gain(np.fft.rfftfreq(m, 1 / SR)) + 1e-6))
    cepstrum[1:m // 2] *= 2
    cepstrum[m // 2 + 1:] = 0
    impulse = irfft(np.exp(rfft(cepstrum)))
    return signal.fftconvolve(x, impulse[None], axes=1)[:, :x.shape[-1]]


def filtered(x, response):
    m = next_fast_len(x.shape[-1] + 4096)
    return irfft(rfft(x, m) * response(np.fft.rfftfreq(m, 1 / SR)), m)[..., :x.shape[-1]]


def along(points, hz):
    f, v = np.transpose(points)
    return np.interp(np.log(hz + 1), np.log(f + 1), v)


def unit(x):
    return x / np.sqrt(np.mean(x ** 2) + 1e-20)


def add(track, s, sound):
    at = max(round(s * SR), 0)
    track[:, at:at + sound.shape[-1]] += sound[..., :N - at]


def scene():
    left = tap() + splashes(SPLASHES, rise_s=0.004, broad=0.33, width=0.22)
    left = left + splashes(SLAPS, rise_s=0.0005, broad=0.16, width=0.2)
    right = drops() + basin() + thumps() + kitchen()
    return from_side(left, side=-0.81) + from_side(right, side=0.83)


def roll_off(x):
    return signal.sosfilt(signal.butter(12, 15850, fs=SR, output="sos"), x)


def record(dry):
    rounded = dry / (1 + np.abs(dry / CEILING) ** 10) ** (1 / 10)
    mix = filtered(rounded, lambda hz: hz < TOP_HZ)
    return roll_off(mix)


dry = scene()
out = record(dry)
materialize(out)
```